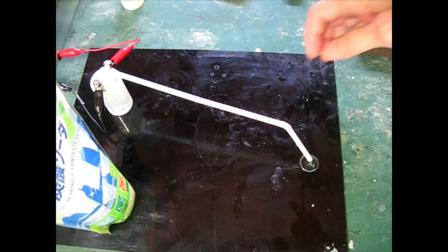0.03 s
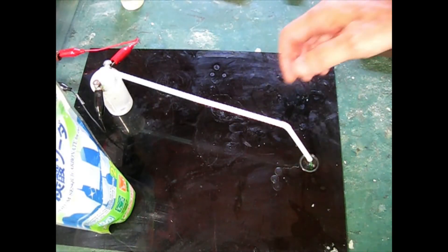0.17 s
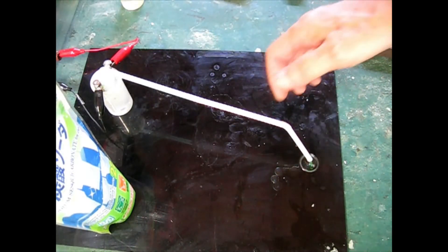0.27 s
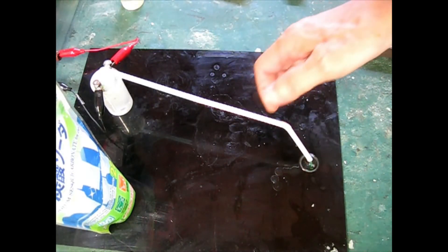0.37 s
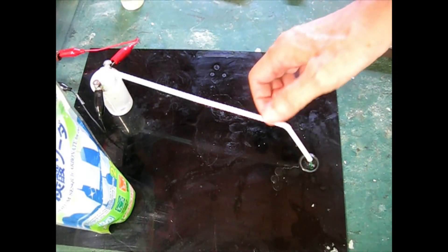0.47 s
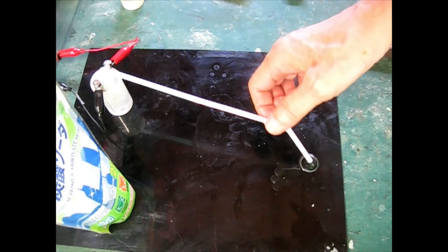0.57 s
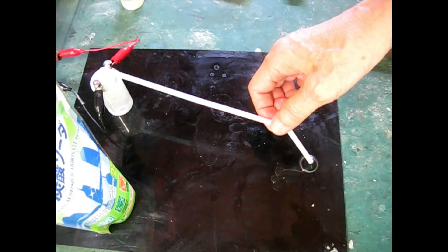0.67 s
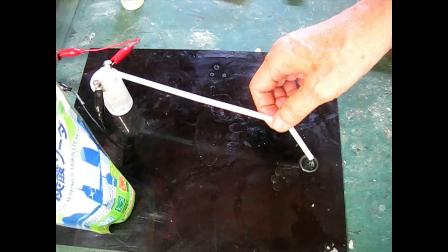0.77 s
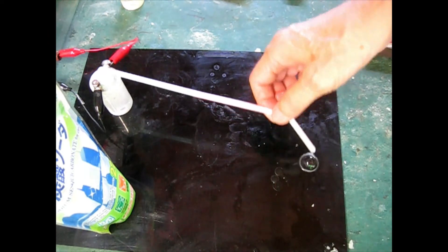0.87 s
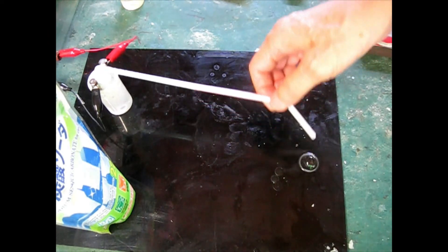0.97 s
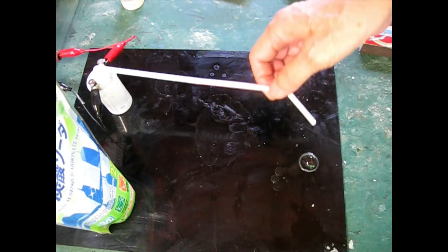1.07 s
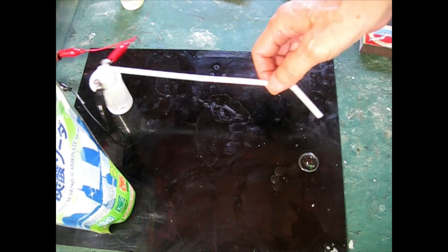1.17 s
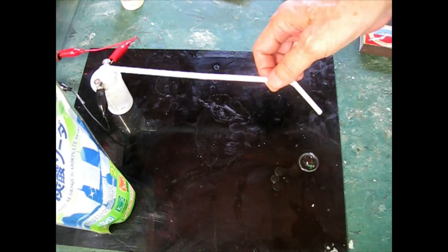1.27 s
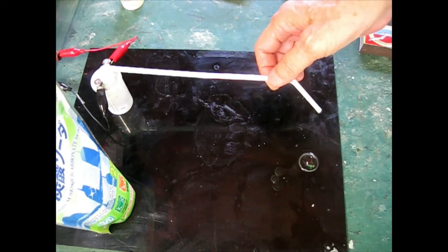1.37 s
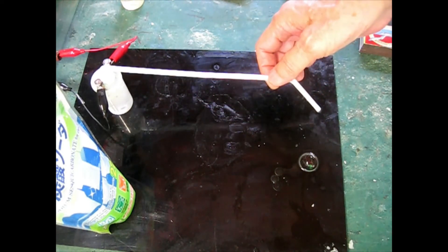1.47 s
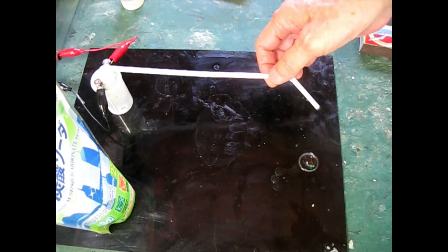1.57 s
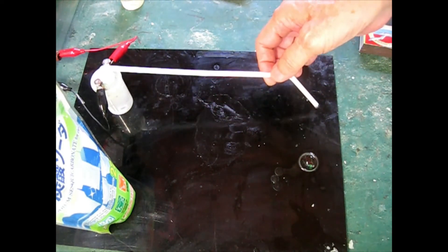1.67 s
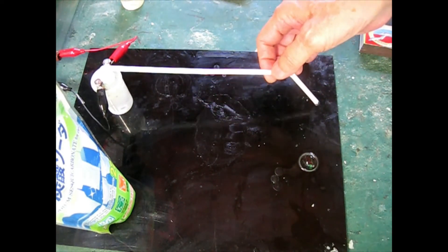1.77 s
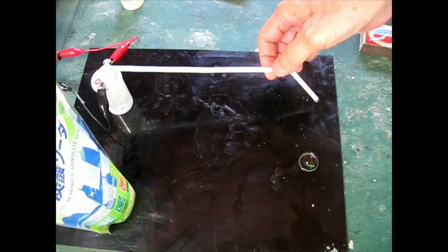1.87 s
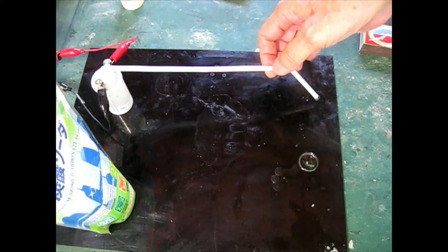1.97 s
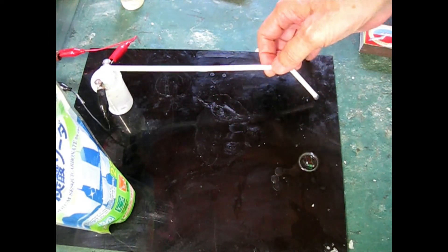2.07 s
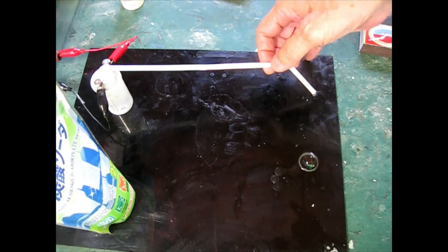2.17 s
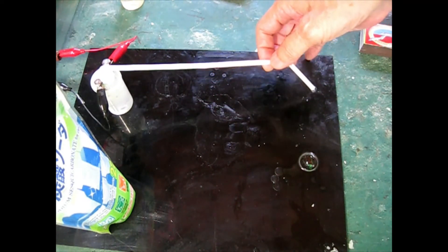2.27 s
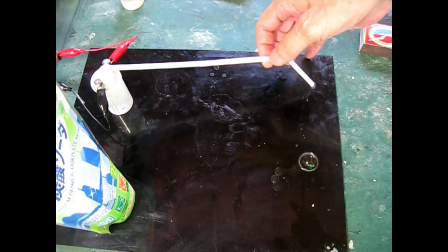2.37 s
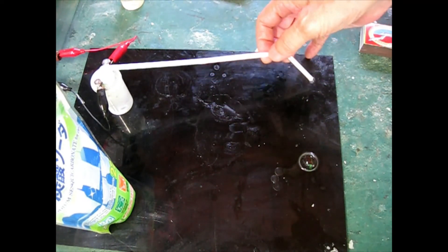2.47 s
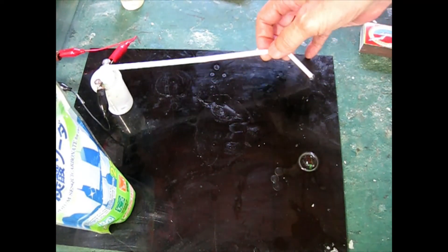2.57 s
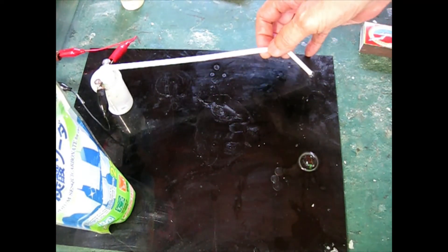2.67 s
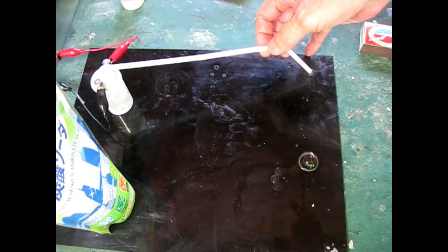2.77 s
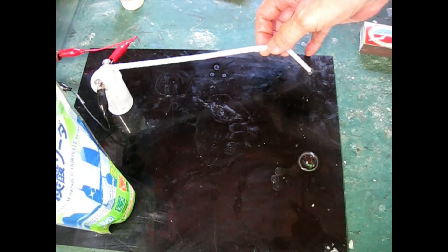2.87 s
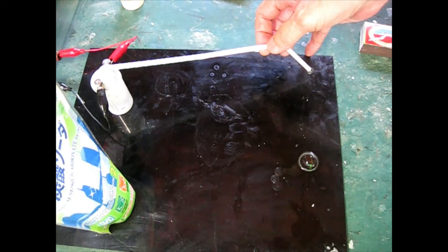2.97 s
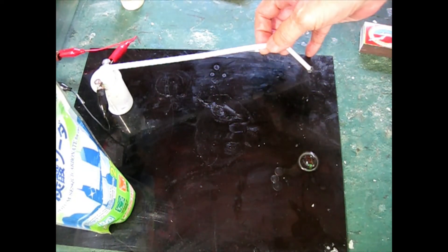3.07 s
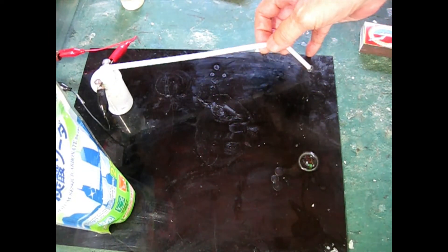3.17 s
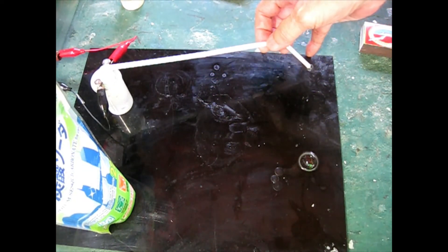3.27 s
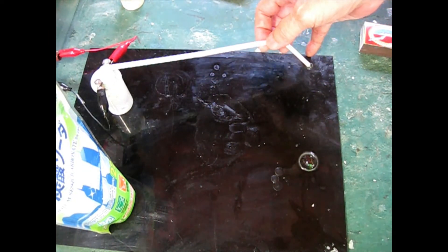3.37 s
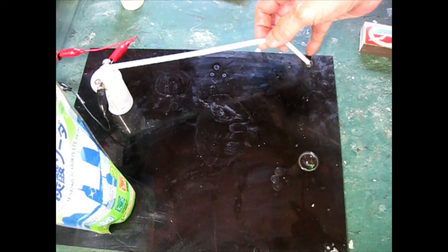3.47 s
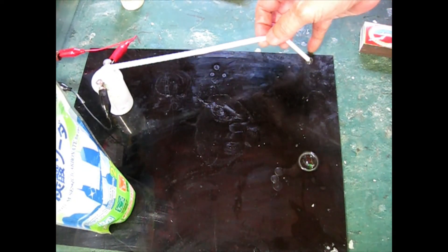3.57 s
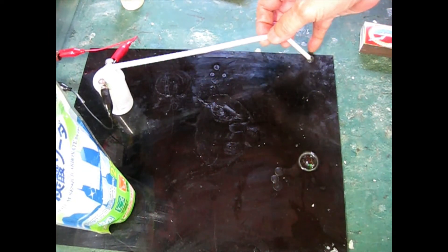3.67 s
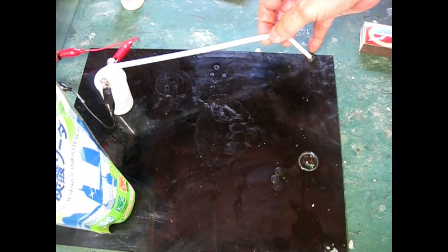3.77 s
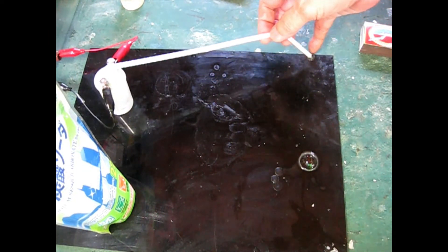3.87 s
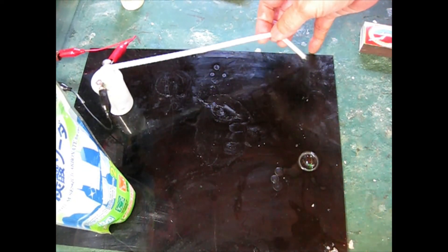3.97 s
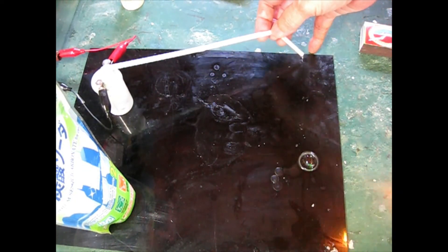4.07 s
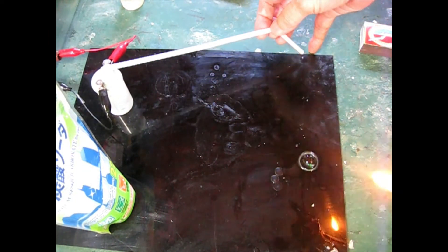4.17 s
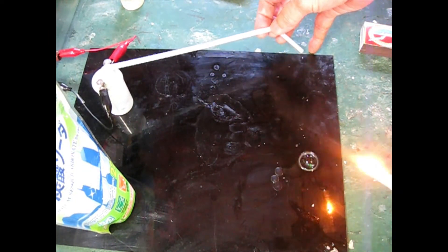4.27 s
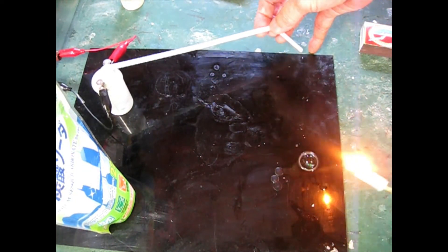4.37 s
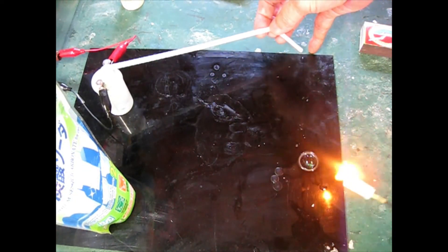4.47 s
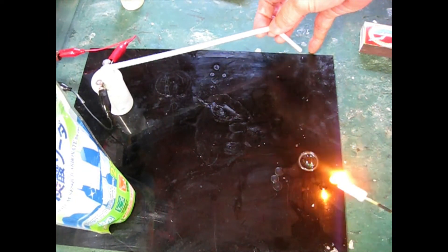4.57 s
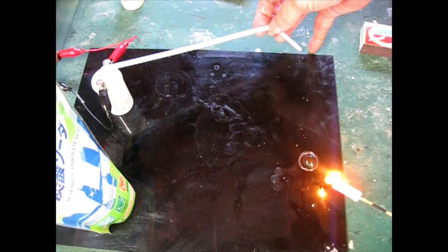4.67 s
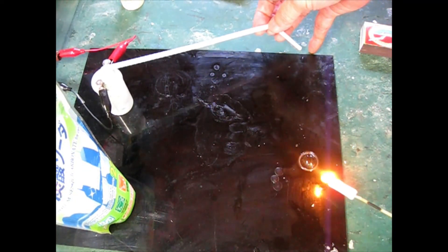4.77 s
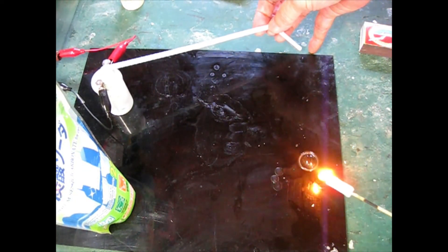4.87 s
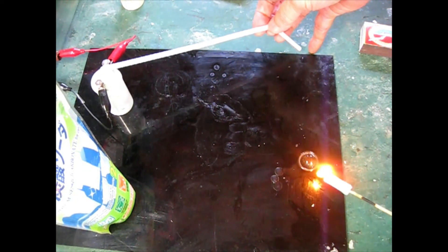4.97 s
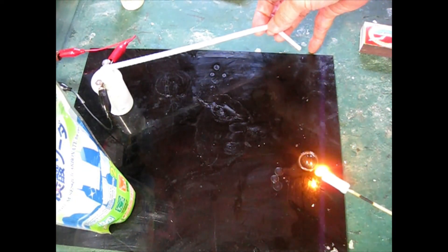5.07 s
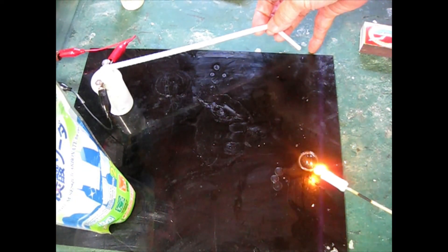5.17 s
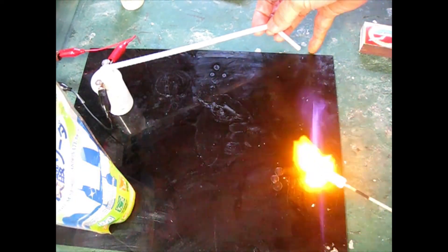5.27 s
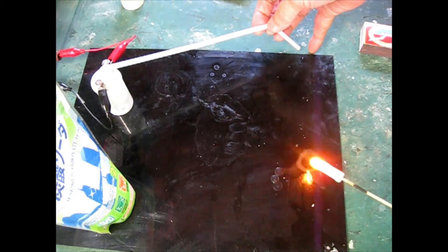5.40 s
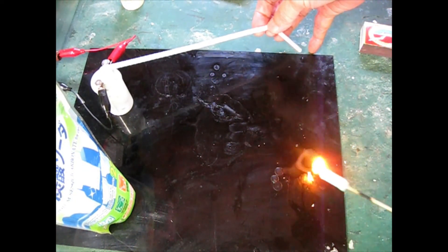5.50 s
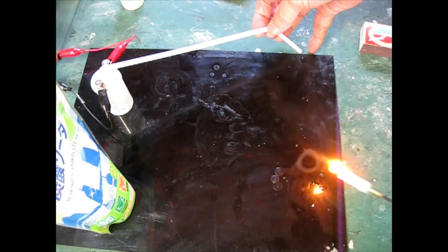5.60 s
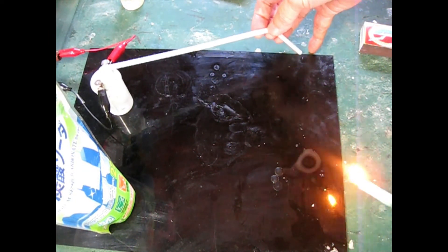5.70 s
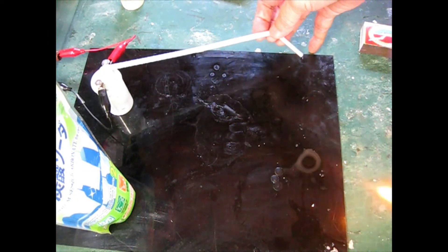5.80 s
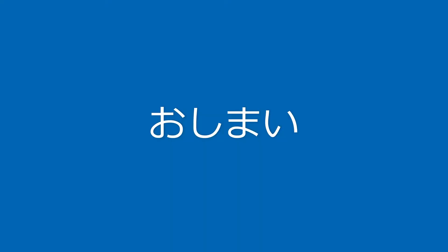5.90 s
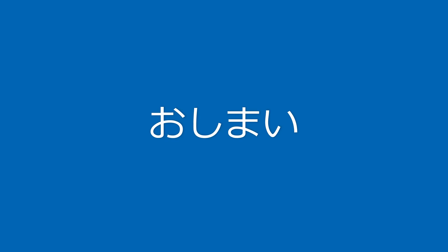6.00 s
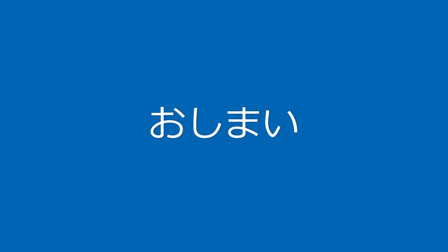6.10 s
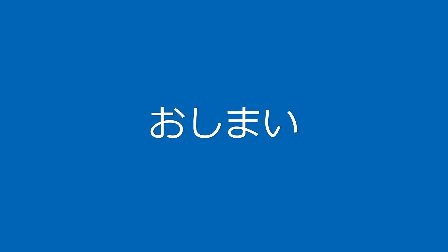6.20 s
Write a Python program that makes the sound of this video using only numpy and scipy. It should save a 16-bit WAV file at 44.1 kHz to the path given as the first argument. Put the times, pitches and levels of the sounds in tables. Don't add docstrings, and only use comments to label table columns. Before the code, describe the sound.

Quiet table handling with brittle plastic snaps, distant frog croaks and a bird chirp, broken by one violent pop and a smaller wooden-sounding clack.

```python
import sys
import numpy as np
from scipy import signal
from scipy.fft import rfft, irfft
from scipy.io import wavfile
from scipy.ndimage import uniform_filter1d

SR = 44100
rng = np.random.default_rng(int(sys.argv[2]) if len(sys.argv) > 2 else 0)


def log_audio(samples):
    frames = np.atleast_2d(samples).T
    limited = np.clip(frames, -1, 1)
    pcm = np.round(limited * 32767).astype(np.int16)
    wavfile.write(sys.argv[1], SR, pcm)


def volts_from_decibels(level):
    exponent = np.asarray(level, float) / 20
    return 10 ** exponent


N = 275175


def evened(x):
    return x / np.sqrt(np.mean(x ** 2) + 1e-20)


def read(points, hz):
    f, value = np.transpose(points)
    return np.interp(np.log(hz + 1), np.log(f + 1), value)


def add(mix, s, sound):
    part = mix[round(s * SR):][:len(sound)]
    part += sound[:len(part)]


def band(x, lo_hz, hi_hz):
    edges = [lo_hz, min(hi_hz, SR / 2 - 100)]
    return signal.sosfilt(signal.butter(2, edges, "bandpass", fs=SR, output="sos"), x)


def resonate(x, hz, width):
    turn = np.exp(2j * np.pi * np.cumsum(hz * np.ones(len(x))) / SR)
    r = np.exp(-np.pi * width / SR)
    return 2 * (turn * signal.lfilter([1 - r], [1, -r], x / turn)).real


def resonant_noise(modes, length, passes, widen):
    out = np.zeros(length)
    for hz, width, db in modes:
        x = rng.standard_normal(length)
        for _ in range(passes):
            x = resonate(x, hz, widen * width)
        out += volts_from_decibels(db) * evened(x)
    return out


def ring(modes, t):
    return sum(volts_from_decibels(db - 60 * t / t60) * np.sin(2 * np.pi * hz * t) for hz, db, t60 in modes)


def coloured(x, points):
    return irfft(rfft(x) * volts_from_decibels(read(points, np.fft.rfftfreq(len(x), 1 / SR))), len(x))


def smooth_noise(length, size):
    return evened(uniform_filter1d(rng.standard_normal(length), size=size))


def room(x, t60, wet_db):
    t = np.arange(SR // 4) / SR
    tail = rng.standard_normal(len(t)) * volts_from_decibels(-60 * t / t60) * (t > .003)
    return x + volts_from_decibels(wet_db) * signal.oaconvolve(x, tail / np.linalg.norm(tail))[:N]


BANG_S, BANG_DB, BANG_WIDTH_S = 5.31865, 13, .0002
# frequency in Hz, level in dB, t60 in seconds.
BANG_BODY = [(720, 0.5, 0.028), (880, -6, .026), (1070, 2.5, 0.03), (2200, 2, 0.04), (2600, -1, 0.018),
             (3280, 5, 0.012), (5200, -3, .015), (6350, -3, .018), (10000, -6, 0.012)]
# delay in seconds, gain.
BANG_ECHOES = [(.0011, 0.43), (.0021, -0.42), (.0031, 0.92), (.0059, -0.84), (.0071, -.9), (.0095, 0.21),
               (0.0132, -.5), (.0148, -0.27)]


def blast():
    t = np.arange(5000) / SR
    u = t / BANG_WIDTH_S
    front = signal.fftconvolve((1 - u) * np.exp(-u), ring(BANG_BODY, t))[:5000]
    front *= volts_from_decibels(BANG_DB) / abs(front).max()
    out = np.zeros(N)
    add(out, BANG_S, front)
    for late, gain in BANG_ECHOES:
        add(out, BANG_S + late, gain * front)
    return out


# time in seconds, level in dB.
TAIL = [(5.3185, -43), (5.3208, -10), (5.3248, -9), (5.33, -21.5), (5.345, -23.5), (5.38, -31),
        (5.475, -37.5), (5.51, -44), (5.56, -53), (5.65, -78)]
# frequency in Hz, width in Hz, level in dB.
TAIL_BASS = [(620, 90, -2), (760, 110, 0), (920, 110, -1), (1080, 80, -3), (1800, 100, -7), (1990, 100, -5),
             (2230, 120, -2.5), (2500, 150, -10), (1350, 150, -12)]
TAIL_TREBLE = [(3340, 990, -4.5), (4900, 480, 4), (6700, 600, 0), (9700, 900, -1.5), (11200, 1800, -3.5)]
TAIL_LOW = [(470, 70, 0), (260, 70, -7)]
# frequency in Hz, level in dB, t60 in seconds.
PUSH = [(40, -27, .12), (79.5, -14, .04), (120, -19, .03), (220, -40, .05)]
TAIL_TREBLE_DB, TREBLE_LOSS_DB_PER_S, FIRST_TREBLE_DB, FIRST_TREBLE_S = -10.5, 14, 11.5, .003
TAIL_LOW_DB, LOW_SWELL_S = -9, .025


def blast_tail():
    s, level_db = np.transpose(TAIL)
    since = np.arange(s[0], s[-1], 1 / SR) - s[0]
    bass, treble, low = (evened(resonant_noise(modes, len(since), passes=3, widen=2.1))
                         for modes in (TAIL_BASS, TAIL_TREBLE, TAIL_LOW))
    treble_db = TAIL_TREBLE_DB - TREBLE_LOSS_DB_PER_S * since
    treble_db += FIRST_TREBLE_DB * np.exp(-(since / FIRST_TREBLE_S) ** 2)
    swell = np.minimum(since / LOW_SWELL_S, 1) ** 2
    answer = bass + volts_from_decibels(treble_db) * treble + volts_from_decibels(TAIL_LOW_DB) * swell * low
    tail = np.zeros(N)
    add(tail, s[0], volts_from_decibels(np.interp(since + s[0], s, level_db)) * answer)
    add(tail, BANG_S, ring(PUSH, since))
    return tail


# start in seconds, peak in dB, t60 in seconds, low mode in Hz, high mode in Hz.
KNOCKS = [(.431, -29, 0.032, 1130, 2200), (1.061, -38, 0.082, 2810, 3220), (1.183, -31, 0.09, 5280, 7160),
          (2.184, -28.5, 0.071, 720, 1900), (2.19, -29.5, 0.068, 1900, 3730),
          (2.201, -31.5, 0.061, 3240, 4430), (1.9595, -33, .03, 4130, 1850),
          (1.9786, -33, 0.033, 4280, 2000), (3.5143, -22, 0.022, 1126, 1580),
          (3.5164, -33, 0.035, 2200, 4600), (3.5175, -35, .022, 3100, 6050),
          (4.018, -34.5, 0.025, 1150, 2200), (4.091, -34.5, 0.027, 1210, 2260),
          (5.753, -29, 0.013, 2600, 4600), (5.7637, -19, 0.03, 1080, 2000),
          (5.7656, -12, 0.015, 2200, 2900), (5.767, -18, 0.055, 1100, 5250), (5.7725, -25, .05, 1900, 2500),
          (5.77, -29.5, 0.18, 524, 2900)]
# start in seconds, frequency in Hz, level in dB, t60 in seconds.
PINGS = [
    (3.5143, 1126, -24, .035),
    (3.5162, 3090, -30, .04),
    (5.767, 1100, -25, .05),
    (.782, 3280, -51, .05),
    (1.06, 2750, -44, 0.074),
    (1.087, 8600, -38, 0.066),
    (1.093, 2754, -41, 0.11),
    (1.185, 2880, -40.5, 0.13),
    (1.184, 9800, -31, 0.036),
]
KNOCK_TREBLE_DB, TREBLE_DB_PER_OCTAVE = -10, 6.5


def knocks():
    out, t = np.zeros(N), np.arange(7000) / SR
    blur = np.clip(t / 0.027, 0, .9)
    for s, db, t60, low_hz, high_hz in KNOCKS:
        z = rng.standard_normal(len(t))
        treble_db = KNOCK_TREBLE_DB + TREBLE_DB_PER_OCTAVE * np.log2(low_hz / 1500)
        rattle = evened(resonate(z, low_hz, 180)) + 1.33 * evened(resonate(z, high_hz, 340))
        rings = np.sin(2 * np.pi * low_hz * t) + 0.81 * np.sin(2 * np.pi * high_hz * t)
        crack = (0.42 + 0.85 * blur) * evened(band(z, 710, 4860))
        crack += volts_from_decibels(treble_db) * evened(band(z, 2950, 12000))
        pitched = (1 - blur) * (0.86 * rings + (0.13 + 0.57 * blur) * rattle)
        envelope = volts_from_decibels(db - 6 - 60 * t / t60) * np.minimum(t / 0.0007, 1)
        add(out, s, envelope * (pitched + crack))
    for s, *mode in PINGS:
        add(out, s, ring([mode], t) * np.minimum(t / 0.0024, 1))
    return out


# frequency in Hz, level in dB, t60 in seconds.
STRAW = [(400, -3.5, .025), (675, 3.5, 0.022), (1396, 0.5, 0.03), (1780, 0.5, 0.016)]
# time in seconds, peak in dB, body level relative to it in dB.
TICKS = [
    (0.1411, -46, -17),
    (0.5402, -40, -8),
    (0.5806, -40.5, -15),
    (0.7333, -38.5, -20.5),
         (0.7799, -47, -8), (0.8058, -31, -19), (0.8262, -40, -15), (0.8497, -32.5, -18),
              (0.8781, -38, -24), (0.8981, -34, -28), (0.9819, -33, -22), (1.0153, -32, -26),
              (1.0727, -24, -31), (1.148, -36, -18), (1.1685, -35, -24), (1.1829, -21, -28),
              (1.2094, -26, -28), (1.2298, -18, -32), (1.2922, -38, -18), (1.3171, -24.5, -35),
              (1.3974, -32, -19), (1.4129, -26.5, -25), (1.4438, -27, -20), (1.4663, -29, -22),
              (1.4977, -40, -14), (1.5197, -39, -12), (1.5631, -37, -22), (1.6105, -38, -15),
              (1.6334, -34, -12), (1.7023, -44, -12), (1.7746, -32, -23), (1.818, -43, -12),
              (1.836, -33.5, -18),
         (1.8758, -43, -13), (1.8878, -38, -13), (1.9406, -39, -18.5), (1.9596, -26.5, -16),
              (1.9786, -26.5, -18), (2.0369, -33, -19), (2.0888, -34, -16), (2.1078, -33, -20),
              (2.1736, -50, -13), (2.1736, -36, -14), (2.1901, -29, -14), (2.2839, -25, -13),
              (2.3053, -24, -11), (2.3447, -37, -7), (2.3552, -25.5, -13.5), (2.3886, -30, -13),
              (2.4081, -40, -12), (2.4181, -30.5, -8), (2.4221, -33, -12.5), (2.4625, -28, -10.5),
              (2.4794, -33.5, -8), (2.5328, -29.5, -12.5), (2.5463, -21.5, -18), (2.5847, -33, -14),
              (2.6041, -31.5, -17), (2.6465, -43, -10.5), (2.6655, -32, -12.5), (2.7294, -28.5, -17),
              (2.7533, -32.5, -6.5), (2.7797, -38, -9),
         (2.8898, -29, -26), (3.1358, -38, -8.5), (3.2043, -26, -29), (3.3423, -36, -15),
              (3.4221, -39, -16), (3.6513, -40, -13), (3.9057, -33, -19), (3.9609, -28, -19),
              (4.0184, -32, -20), (4.157, -36.5, -15), (4.3217, -32, -20), (4.7247, -40, -13),
              (4.786, -39, -14), (5.0439, -36, -20), (5.0838, -41, -14.5),
         (5.5606, -39, -19),
    (5.5982, -35, -19),
    (5.654, -31, -23),
    (5.6992, -35, -15),
    (5.7292, -29.5, -19),
    (5.743, -36, -7.5),
    (5.7658, -30, -10),
    (5.877, -37, -15.5),
         (.809, -30, -25), (.857, -34, -23), (1.032, -36.5, -27), (1.1, -31, -28), (1.116, -34, -30),
         (1.124, -35, -28), (1.134, -37, -25), (1.234, -31, -28), (1.24, -35, -25), (1.247, -28, -26),
         (1.257, -38, -25), (1.408, -30, -25), (1.453, -29, -25), (1.997, -33, -14), (2.1136, -31, -18),
         (2.127, -35, -20), (2.38, -38, -4), (3.5139, -38, -22), (5.7591, -30, -18), (2.5, -39, -8),
         (2.5122, -38, -9), (2.7077, -31.5, -13), (2.836, -42.5, -5), (2.8548, -38.5, -4)]
MID_LINGER_DB = 14
LOW_SNAP_DB = 0.5
TICK_MID_DB, MID_PER_BODY, MID_PER_PRESSURE = -6, 0.21, 0.42
CREASING_BODY_DB = -6


def ticks():
    rows = TICKS
    out, t = np.zeros(N), np.arange(2000) / SR
    shape = (volts_from_decibels(-60 * t / .004) + .07 * volts_from_decibels(-60 * t / .04)) * np.minimum(t / .0003, 1)
    bursts = rng.standard_normal((len(rows), len(t))) * shape
    snaps = band(band(bursts, 9600, 12900), 9600, 13200)
    lows = band(bursts, 8100, 10030)
    middles = band(bursts * volts_from_decibels(MID_LINGER_DB * np.minimum(t / 0.0071, 1)), 3440, 6650)
    grips = rng.uniform(-0.8, 1, (len(rows), 2, len(STRAW)))
    crackle_s, _, pressure_db = np.transpose(CRACKLE)
    for (s, db, body_db), snap, low, middle, grip in zip(rows, snaps, lows, middles, grips):
        modes = [(f * (1 + .14 * a), level + 7 * b, t60) for (f, level, t60), a, b in zip(STRAW, *grip)]
        body = ring(modes, t)
        duller_db = MID_PER_BODY * body_db + MID_PER_PRESSURE * np.interp(s, crackle_s, pressure_db)
        snap = snap + volts_from_decibels(LOW_SNAP_DB + duller_db) * low
        creasing = CREASES[0][0] - .01 < s < CREASES[-1][0] + .01
        parts = snap / abs(snap).max()
        parts += volts_from_decibels(TICK_MID_DB + duller_db) * middle / abs(middle).max()
        parts += volts_from_decibels(body_db + 6.5 + CREASING_BODY_DB * creasing) * body / abs(body).max()
        add(out, s + .0007, volts_from_decibels(db + 1.5) * parts)
    return out


# time in seconds, crackle level in dB, finger pressure in dB.
CRACKLE = [(0, -55.5, 7), (.79, -59.5, 4), (.805, -48, -6), (.977, -43.5, -7), (1.053, -45.5, 1),
           (1.27, -49.5, -0.5), (1.7, -52.5, -2), (1.86, -53, 2), (1.87, -50, 7), (2.564, -51, 8),
           (2.8, -54, 3.5), (2.82, -59.5, -3), (3.74, -63, -7), (4.01, -58, 2), (5.5, -63, -5),
           (5.718, -55.5, 0), (5.786, -52, -6), (5.93, -74.5, 0)]
# frequency in Hz, level in dB.
CRACKLE_TONE = [(5000, -36), (6500, -15), (8500, -14), (9800, -11), (10800, -3), (12200, -4),
                (13200, -16.5), (15500, -19.5), (16500, -26)]
CRACKLE_PER_S, CRACKLE_SPREAD_DB = 1700, 3.2
MID_RUSTLE_DB, LOW_RUSTLE_DB, BODY_RUSTLE_DB, BODY_PER_PRESSURE = -12, -16.5, -16.5, 0.86


def crackle():
    s, *columns = np.transpose(CRACKLE)
    level_db, pressure_db = (np.interp(np.arange(N) / SR, s, c) for c in columns)
    clumps = volts_from_decibels(1.3 * smooth_noise(N, 500))
    strengths = volts_from_decibels(CRACKLE_SPREAD_DB * np.minimum(rng.exponential(1, N), 4))
    snaps = strengths * (rng.random(N) < CRACKLE_PER_S / SR)
    bursts = signal.lfilter([1], [1, -.96], snaps * clumps) * rng.standard_normal(N)
    body = ring(STRAW, np.arange(1500) / SR * 1.6)
    rustle = evened(coloured(bursts, CRACKLE_TONE))
    rustle += volts_from_decibels(MID_RUSTLE_DB + pressure_db) * evened(band(bursts, 3300, 8000))
    rustle += volts_from_decibels(LOW_RUSTLE_DB + pressure_db) * evened(band(bursts, 8300, 9700))
    dull = evened(signal.oaconvolve(bursts, body)[:N])
    rustle += volts_from_decibels(BODY_RUSTLE_DB + BODY_PER_PRESSURE * pressure_db) * dull
    return volts_from_decibels(level_db) * rustle


# time in seconds, peak in dB, low mode in Hz, high mode in Hz, high mode's relative level in dB.
CREASES = [(2.283, -41, 363, 1620, -2), (2.305, -33, 673, 1370, -6), (2.353, -41, 299, 1400, -8),
           (2.377, -39, 600, 1820, -5), (2.42, -36, 665, 1530, -11), (2.432, -44, 283, 1490, -2),
           (2.461, -37, 382, 1360, -10), (2.482, -42, 676, 1860, -7), (2.499, -42, 638, 1730, -7),
           (2.529, -41, 307, 1910, -6), (2.545, -40, 778, 1890, -4), (2.584, -44, 665, 1720, -5),
           (2.604, -43, 404, 1390, -7), (2.665, -43, 751, 1760, -6), (2.709, -47, 794, 1870, -1),
           (2.728, -39, 781, 1230, -13), (2.752, -36, 431, 1240, -14), (2.779, -44, 390, 2170, -4),
           (2.855, -37, 301, 1530, -14)]
CREASE_T60, CREASE_DB = .019, 4.5


def creases():
    out, t = np.zeros(N), np.arange(1500) / SR
    for s, db, low_hz, high_hz, high_db in CREASES:
        modes = [(low_hz, 0, CREASE_T60), (1.7 * low_hz, -8, .6 * CREASE_T60),
                 (high_hz, high_db + 4, .8 * CREASE_T60)]
        add(out, s + .0012, volts_from_decibels(db + CREASE_DB) * ring(modes, t) * np.minimum(t / .0008, 1))
    return out


# start in seconds, length in seconds, peak in dB, top pitch in Hz, place of the top from 0 to 1.
BIRD = [
    (0.221, 0.038, -35.5, 5950, .3),
    (0.321, 0.031, -36.5, 5900, 0.36),
    (1.068, 0.04, -48, 6570, .05),
]
CHIRP_FLUTTER = [.35, .9, .3]
CHIRP_UPPER = [.85, .3, .6]
CHIRP_ENDS = [.7, .84, .9]
CHIRP_START, UPPER_VOICE = .7, 1.16
CHIRP_RISE_DB, CHIRP_FALL_DB = 12, 12


def bird():
    out = np.zeros(N)
    for (s, length, db, top_hz, top), throb, upper, end in zip(BIRD, CHIRP_FLUTTER, CHIRP_UPPER, CHIRP_ENDS):
        t = np.arange(0, length, 1 / SR)
        before = np.maximum(1 - t / length / top, 0)
        after = np.maximum((t / length - top) / (1 - top), 0)
        hz = top_hz * (1 - (1 - CHIRP_START) * before ** 2.24 - (1 - end) * after ** 2.1)
        flutter = 1 + throb * np.sin(2 * np.pi * 180 * t - 4.6) + 0.2 * smooth_noise(len(t), 60)
        phase = 2 * np.pi * np.cumsum(hz * (1 + .02 * smooth_noise(len(t), 40))) / SR
        voices = 1.16 * np.sin(phase) + upper * np.sin(UPPER_VOICE * phase)
        level = volts_from_decibels(db - CHIRP_RISE_DB * before - CHIRP_FALL_DB * after ** 0.96)
        add(out, s, level * flutter * voices * signal.windows.tukey(len(t), .15))
    return room(out, 0.22, wet_db=-3)


# start in seconds, peak in dB.
FROG = [
    (1.3834, -42.5),
    (2.0862, -39),
    (2.7786, -42),
    (4.2744, -44),
    (4.9754, -40.5),
    (5.671, -41.5),
]


def frog():
    out, t = np.zeros(N), np.arange(700) / SR
    pulse = ring([(2235, 2.0, 0.031), (2350, -12, .018)], t) * np.minimum(t / 0.001, 1)
    for s, db in FROG:
        for late, gain in ((0, 0.97), (.0075, 1.56), (.014, .55), (.021, 0.64)):
            add(out, s + late, gain * volts_from_decibels(db - 1.5) * pulse)
    return room(out, 0.57, wet_db=-5.0)


# frequency in Hz, density in dB per Hz.
AIR = [(12, -33), (20, 0), (151, -10.5), (179, -5), (281, -9.5), (323, -8), (393, -10), (599, -10),
       (839, -12.5), (1350, -11), (7100, -20), (7730, -21.5), (12100, -18), (15200, -31), (16500, -42)]
# frequency in Hz, width in Hz, level in dB.
FAN = [(148, 22, -69.5), (394.3, 25, -64), (863.5, 96, -64), (1241, 30, -68), (1467, 45, -66),
       (714, 20, -72.5)]
AIR_DB, HUM_HZ, HUM_DB = -50, 150, -61.5


def air():
    hz = np.fft.rfftfreq(1024, 1 / SR)
    a, b, patches = rng.standard_normal((N // 256 + 5, 513, 3)).T
    patches = evened(uniform_filter1d(uniform_filter1d(patches, size=12, axis=0), size=12, axis=1))
    spectrum = (a + 1j * b) * volts_from_decibels(read(AIR, hz)[:, None] + 1.6 * patches)
    wash = signal.istft(spectrum, nperseg=1024, noverlap=768)[1][:N]
    tones = resonant_noise(FAN, N, passes=2, widen=1)
    waver = 1 + 0.013 * smooth_noise(N, 4000)
    hum = volts_from_decibels(HUM_DB) * np.sqrt(2) * np.sin(2 * np.pi * HUM_HZ * np.cumsum(waver) / SR)
    return volts_from_decibels(AIR_DB) * evened(wash) + tones + hum


def scene():
    grab = volts_from_decibels(-np.interp(np.arange(N) / SR - BANG_S, [.0039, .0046, .02], [0, 18, 24]))
    bang = blast() * grab + blast_tail()
    table = room(knocks() + ticks() + crackle() + creases(), .12, wet_db=-9)
    return (bang + table + bird() + frog() + air())[None]


# time in seconds, half length in seconds, spared below in Hz, then surviving tones in Hz.
THINNED = [
    (1.908, .008, 1500, 4200, 11700),
    (2.232, .008, 1500, 4150, 11900),
    (2.635, .007, 600, 4900, 11100, 1450, 400),
    (3.192, .01, 1000, 7200, 10900),
    (3.552, .008, 2200, 6600, 3600),
    (3.702, .008, 400, 3100, 12500),
    (3.785, .008, 2300, 9700, 12500),
    (5.3125, .004, 1200, 700, 900),
    (5.451, .007, 3000, 4850, 6900),
]
THINNED_DB, SURVIVOR_DB = -21, -57


def thinned(x):
    hz, t, z = signal.stft(x, SR, nperseg=256, noverlap=192)
    loss_db = -30 * (hz[:, None] > 15900) + 0 * t
    tones, now = np.zeros(N), np.arange(N) / SR
    for s, half, spared_hz, *kept in THINNED:
        gap = np.exp(-((t - s) / (0.7 * half)) ** 4)
        loss_db = loss_db + THINNED_DB * gap * (hz[:, None] > spared_hz)
        for f in kept:
            swell = np.exp(-((now - s) / (1.5 * half)) ** 4)
            tones += volts_from_decibels(SURVIVOR_DB) * swell * np.sin(2 * np.pi * f * now)
    return signal.istft(z * volts_from_decibels(loss_db), SR, nperseg=256, noverlap=192)[1][:N] + tones


def band_limit(x):
    return signal.sosfilt(signal.butter(12, 16970, fs=SR, output="sos"), x)


# frequency in Hz, gain in dB.
NOTCH = [(7300, 0), (7600, -5), (7740, -10), (7800, -26), (8050, -26), (8130, -8), (8400, 0)]
# time in seconds, gain in dB.
FADE = [(5.925, -1), (5.945, -10), (5.952, -14), (5.959, -46.5), (5.981, -44), (5.983, -120)]


def record(dry):
    x = np.clip(dry[0], -.99, .99)
    x = coloured(thinned(x), NOTCH)
    s, db = np.transpose(FADE)
    mix = (x * volts_from_decibels(np.interp(np.arange(N) / SR, s, db)))[None]
    return band_limit(mix)


dry = scene()
out = record(dry)
log_audio(out)
```